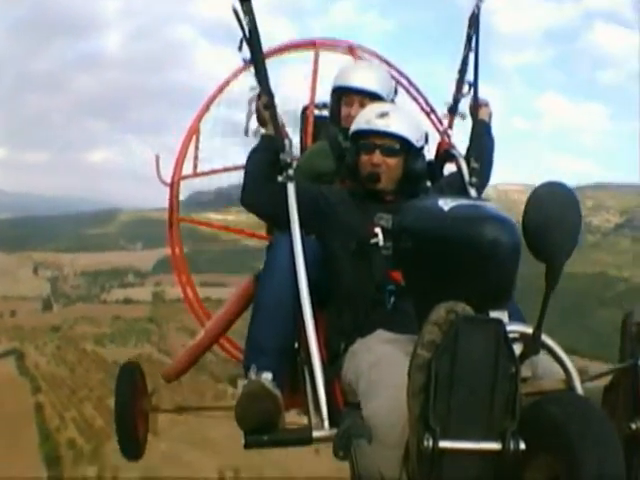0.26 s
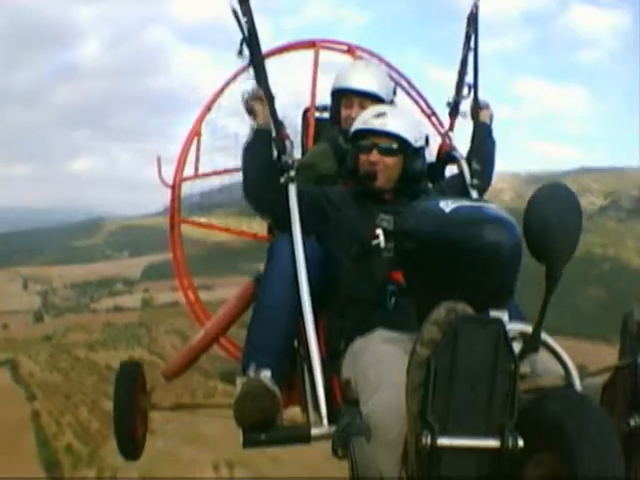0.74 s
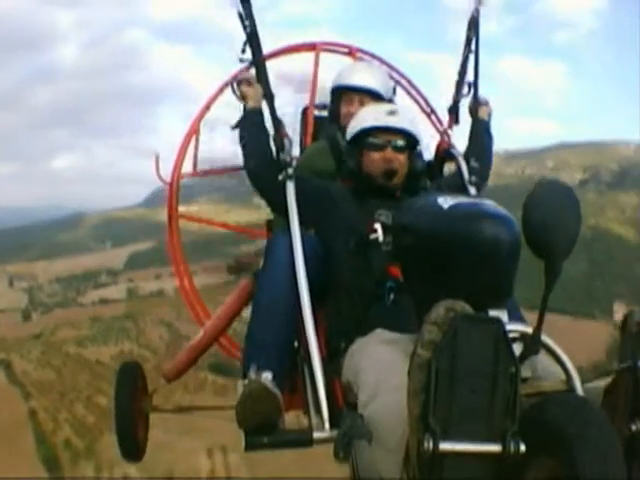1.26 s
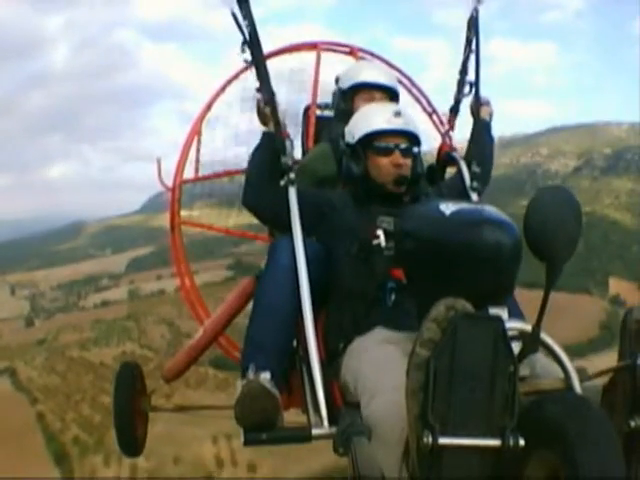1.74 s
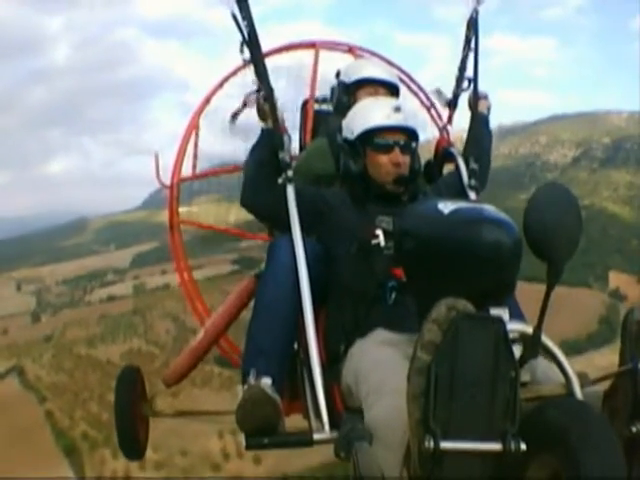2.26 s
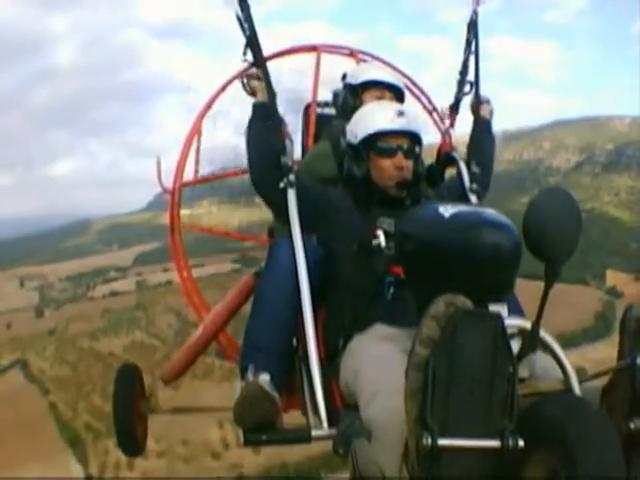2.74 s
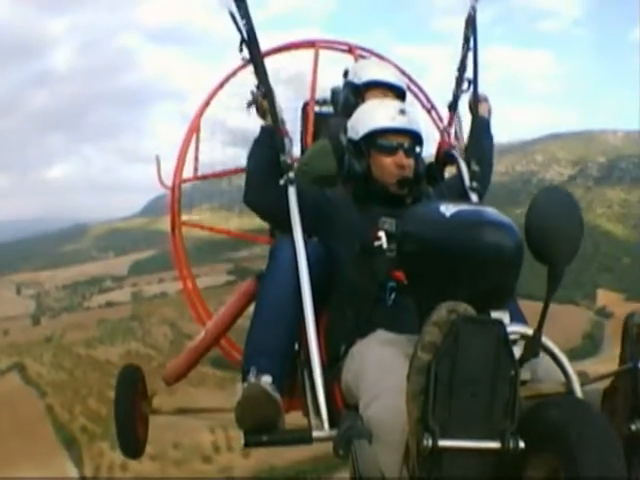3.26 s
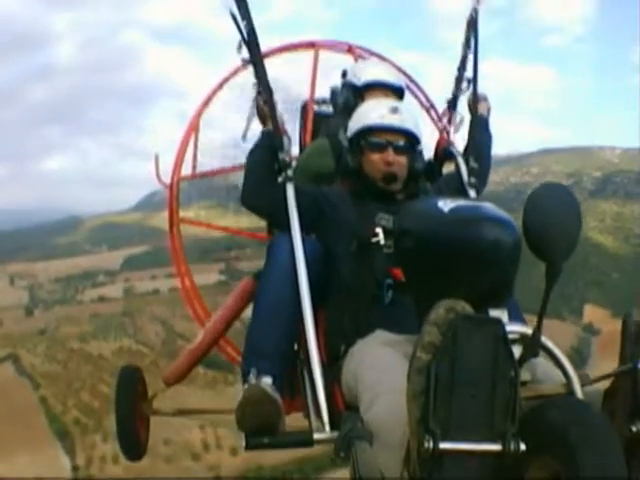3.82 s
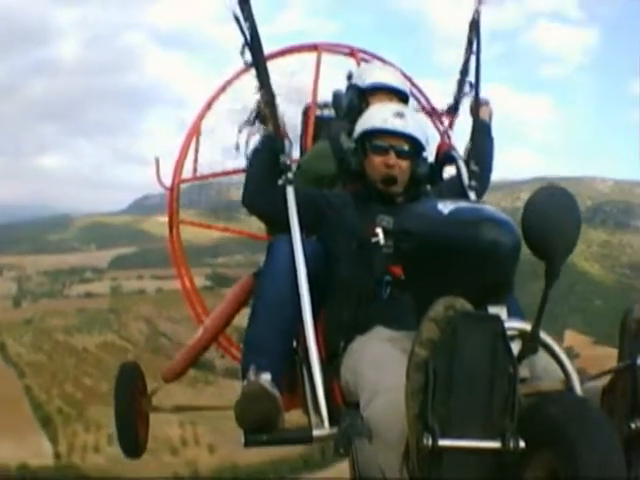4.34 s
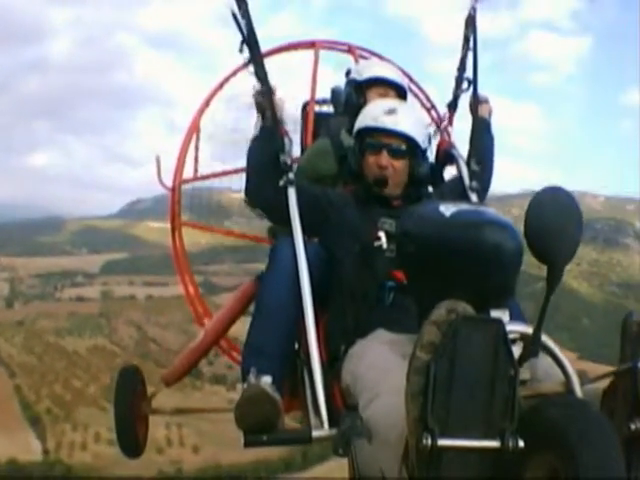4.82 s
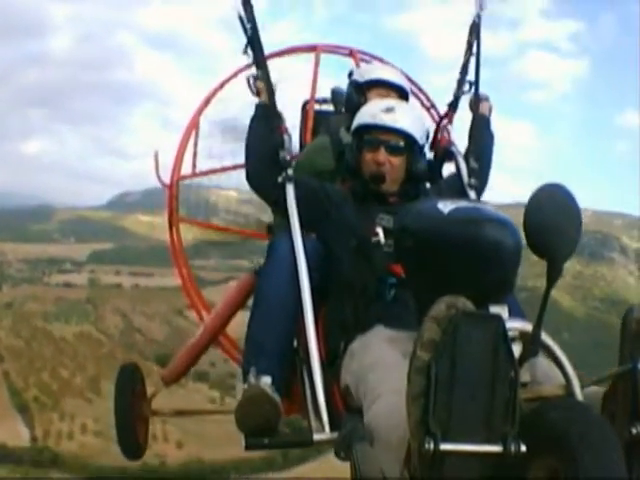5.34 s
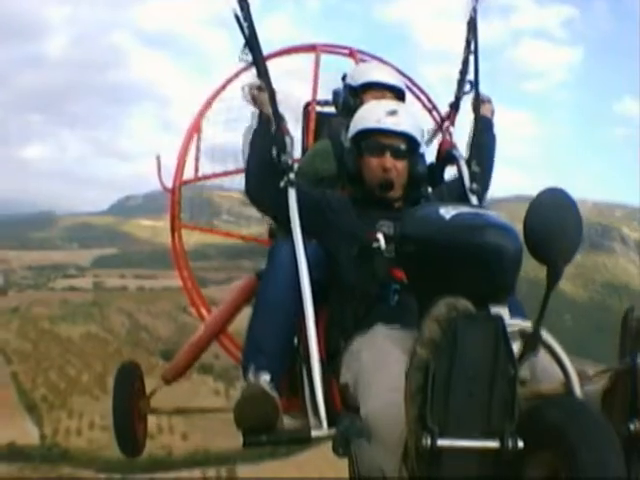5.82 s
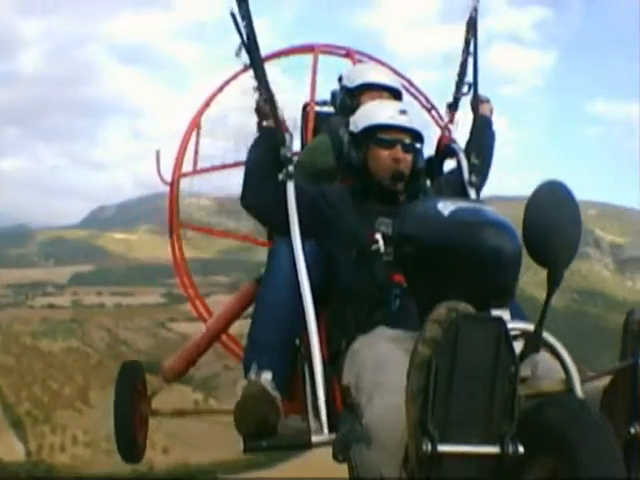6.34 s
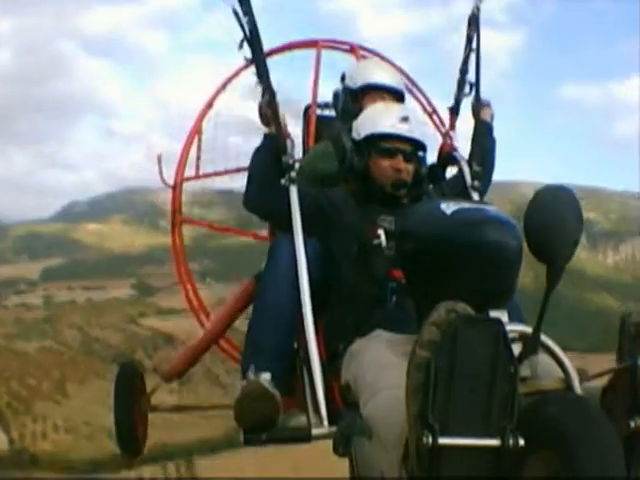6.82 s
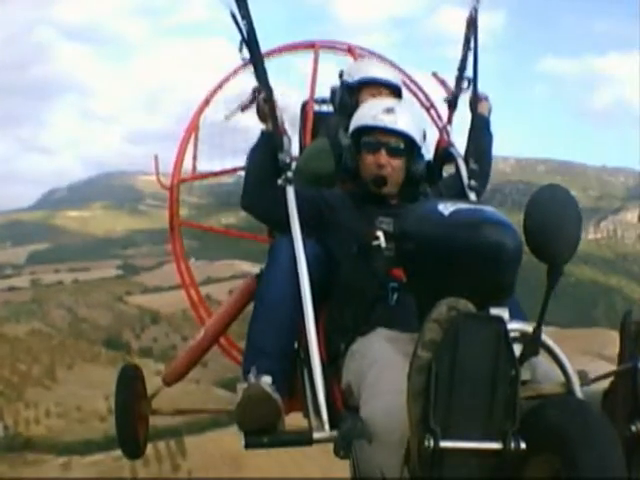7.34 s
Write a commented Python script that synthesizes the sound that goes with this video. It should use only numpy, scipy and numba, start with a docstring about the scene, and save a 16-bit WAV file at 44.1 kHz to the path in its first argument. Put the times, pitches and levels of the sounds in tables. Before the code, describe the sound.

A powered paraglider cruises through open air, its two-stroke engine buzzing and its propeller droning at constant throttle. A roar of rushing wind blends with the drone throughout, along with a faint rasp. Short, sharp pops strike at irregular intervals, several a second, each making the sound dip for an instant. The small onboard microphone is close, and the sound is coarse, slightly distorted and light on bass.

```python
"""Paramotor trike in cruise

A two-stroke's firings and the geared propeller's blade beats stand over the roar of the slipstream.
The throttle is steady. A small camera on a boom in front of the pilot hears it all.
Pressure bursts overload the camera: it clips, ducks its gain and lets it creep back; it samples coarsely."""
import sys
import numpy as np
from scipy import signal
from scipy.fft import rfft, irfft, next_fast_len
from scipy.io import wavfile
from scipy.ndimage import uniform_filter1d
from numba import njit

SR = 44100
rng = np.random.default_rng(int(sys.argv[2]) if len(sys.argv) > 2 else 0)


def master_out(mix):
    """Clip the mix to full scale and print it as 16-bit PCM to the path in sys.argv[1]."""
    frames = np.transpose(np.atleast_2d(mix))
    ceiling = np.clip(frames, -1, 1)
    pcm = np.round(ceiling * 32767).astype(np.int16)
    wavfile.write(sys.argv[1], SR, pcm)


N = 334278
CEILING = 0.63  # gain control threshold


def undb(db):
    """Decibels to gain."""
    return 10 ** (np.asarray(db) / 20)


def butter(x, order, hz, kind):
    """Causal Butterworth filter."""
    return signal.sosfilt(signal.butter(order, hz, kind, fs=SR, output="sos"), x)


def curve(rows):
    """Rows of (seconds, value), interpolated to every sample."""
    return np.interp(np.arange(N) / SR, *np.transpose(rows))


def walk(rate_hz, hop=32):
    """Random levels held 1 / rate_hz seconds and smoothed twice; unit spread."""
    hold = int(SR / hop / rate_hz)
    steps = np.repeat(rng.standard_normal(N // hop // hold + 2), hold)
    smooth = uniform_filter1d(uniform_filter1d(steps, hold), hold)
    return np.interp(np.arange(N) / hop, np.arange(len(smooth)), smooth / smooth.std())


def note(cycles, partials, waver_db, waver_hz):
    """Partials locked to a shaft; turbulence makes each waver on its own."""
    out = 0
    for multiple, db in partials:
        amplitude = np.sqrt(2) * undb(db + waver_db * walk(waver_hz))
        out += amplitude * np.sin(2 * np.pi * (multiple * cycles + rng.random()))
    return out


# Slipstream spectrum. Each row: frequency in Hz, relative density in dB.
ROAR_SPECTRUM = [(20, -16), (32, 3), (50, -8.5), (110, -9.5), (170, -10.5), (260, -4), (400, -2.5),
                 (700, 0.5), (1000, -3), (1400, -8.5), (2000, -18.5), (2700, -28), (3600, -27), (4600, -32),
                 (5800, -28)]


def slipstream(firings, blades, level_db=-14, gust_db=.5, gust_hz=2.51):
    """Half-octave bands of roar flicker apart; the upper ones surge, chopped by firings and blades."""
    size = next_fast_len(N)
    hz = np.fft.rfftfreq(size, 1 / SR).clip(1)
    knot_hz, knot_db = np.transpose(ROAR_SPECTRUM)
    spectrum = rfft(rng.standard_normal(size)) * undb(np.interp(np.log(hz), np.log(knot_hz), knot_db))
    chop = 0.056 * np.cos(2 * np.pi * firings) + 0.18 * np.cos(2 * np.pi * blades)
    roar, surge_db = 0, 1.02 * walk(rate_hz=14.)
    for centre_hz in 20 * 2 ** np.arange(0, 9, .5):
        share = np.cos(np.pi * np.log2(hz / centre_hz).clip(-.5, .5)) ** 2  # neighbours sum to one
        band = irfft(spectrum * share, size)[:N]
        upper = min(centre_hz / 1360, 1)
        flicker_db = 0.86 * walk(rate_hz=8.2)
        roar += band * undb(flicker_db + upper * surge_db) * (1 + upper * chop)
    return roar / roar.std() * undb(level_db + gust_db * walk(gust_hz))


# Strong pressure bursts. Each row: time of the push in seconds, level in dB re CEILING.
STRONG_BURSTS = [(0.077, 8), (0.4, 6), (0.5, 11.5), (0.733, 9), (1.122, 11), (1.189, 11), (1.277, 8),
                 (1.333, 10), (1.491, 11.5), (1.699, 14), (1.984, 9), (2.212, 8), (2.527, 11), (2.738, 12),
                 (2.79, 7), (3.048, 8.5), (3.27, 8), (3.313, 10), (3.469, 9.5), (3.568, 9), (3.745, 14.5),
                 (3.869, 11), (4.356, 10.5), (4.478, 8), (4.837, 8), (4.899, 14), (5.199, 11), (5.289, 9.5),
                 (5.39, 11), (5.448, 9), (5.773, 12.5), (6.102, 9.5), (6.315, 12), (6.383, 7.5),
                 (6.65, 14.5), (6.741, 6.5), (6.987, 8), (7.467, 7.5)]


def pressure_bursts(swing_hz=560, small_per_s=2.5, small_db=6, spread_db=1.5):
    """Each is one swing, suction then push; smaller ones fall at random among the strong."""
    cycles = np.arange(-1, .5, swing_hz / SR)
    swing = np.cos(2 * np.pi * cycles) * np.hanning(len(cycles)) ** 1.02
    draws = rng.random((int(small_per_s * N / SR), 2))
    small = [(.01 + when * N / SR, small_db + spread_db * (2 * size - 1)) for when, size in draws]
    out = np.zeros(N + SR)
    for push_s, db in list(STRONG_BURSTS) + small:
        start = int((push_s - 1 / swing_hz) * SR)
        out[start:start + len(swing)] += CEILING * undb(db) * swing
    return out[:N]


# Frame hums. Each row: multiple of the firing rate, level in dB.
FRAME_PARTIALS = [(.535, -38), (2.14, -40), (3.72, -49)]


def frame(firings):
    """The frame hums faintly, following the crank."""
    return note(firings, FRAME_PARTIALS, waver_db=1.5, waver_hz=2.1)


# Propeller note. Each row: multiple of the blade rate, level in dB.
PROPELLER_PARTIALS = [(1, -36.5), (2, -40), (3, -29), (4, -30.5), (5, -30), (6, -34), (7, -32.5),
                      (8, -33.5), (10, -39), (11, -34.5), (14, -42), (15, -43.5), (16, -46), (17, -40.5),
                      (18, -42.5), (19, -49)]


def propeller(blades):
    """Blade beats make a harmonic drone."""
    return note(blades, PROPELLER_PARTIALS, waver_db=2.42, waver_hz=4.07)


# Exhaust note. Each row: multiple of the firing rate, level in dB, dB added at a colour shift of 1.
EXHAUST_PARTIALS = [(1, -36.5, -6), (2, -27, 0.5), (3, -23, -1.5), (4, -27, 7.5), (5, -26.5, -1.5),
                    (6, -23.5, 2.5), (7, -25.5, -3.5), (9, -29, 1), (10, -30.5, -1), (11, -32, -4.5),
                    (12, -33, 0), (13, -33, 2), (14, -36.5, -2), (16, -40.5, -5), (17, -48.5, 3),
                    (18, -44.5, 4), (19, -49, -2)]
# Drift of the exhaust's colour. Each row: time in seconds, unitless shift.
COLOUR_SHIFT = [(0, .05), (2.1, .2), (3, -0.21), (3.5, 0.16), (4.7, -.13), (5.8, 0.82), (6.5, 0.67),
                (7, .05), (7.58, -.14)]


def exhaust(firings):
    """Two-stroke firings make a harmonic buzz whose colour drifts."""
    shift = curve(COLOUR_SHIFT)
    partials = [(multiple, db + shift_db * shift) for multiple, db, shift_db in EXHAUST_PARTIALS]
    return note(firings, partials, waver_db=1.3, waver_hz=9.)


def rasp(drone, sharpness=1.8, level_db=-33):
    """A crackle that rides the drone's pressure peaks."""
    peaks = uniform_filter1d(np.abs(drone), size=40) ** sharpness
    crackle = peaks * butter(rng.standard_normal(N), 2, [2100, 4200], "band")
    return undb(level_db) * crackle / crackle.std()


# Crank speed. Each row: time in seconds, firings per second.
FIRING_RATE = [(0.0, 99.9), (0.6, 99.86), (1.2, 99.54), (1.8, 99.37), (2.4, 99.46), (3.3, 99.8),
               (3.9, 99.62), (4.8, 99.5), (6.0, 99.5), (6.6, 98.73), (6.9, 98.87), (7.2, 99.24),
               (7.58, 99.45)]


def scene(blades_per_firing=.9035, tone_gain_db=2.5):
    """The crank paces exhaust, frame and, through a reduction drive, propeller; roar and bursts join."""
    firings = np.cumsum(curve(FIRING_RATE)) / SR
    blades = blades_per_firing * firings
    tones = exhaust(firings) + propeller(blades) + frame(firings)
    drone = undb(tone_gain_db) * tones + slipstream(firings, blades)
    return (drone + rasp(drone) + pressure_bursts())[None]


@njit
def gain_control(x, attack_s=0.00024, release_s=0.024):
    """Ducks fast on peaks over the ceiling, recovers slowly."""
    out, envelope = np.empty(len(x)), CEILING
    for i in range(len(x)):
        out[i] = x[i] * CEILING / envelope
        peak = max(abs(x[i]), CEILING)
        envelope += (peak - envelope) / (SR * (attack_s if peak > envelope else release_s))
    return out


def overload(x, rail=.69, push_rail=.54, coupling_hz=115):
    """The amplifier saturates earlier on the push; its coupling lets pushes overshoot to the rail."""
    saturated = np.clip(x, -rail, push_rail)
    return np.clip(butter(saturated, 1, coupling_hz, "high"), -rail, rail)


def coarse_sampling(x, anti_alias_hz=3900, camera_hz=12100, converter_hz=32000, step_share=0.21):
    """A crude converter glides, then steps, mirroring the sound about multiples of the camera rate."""
    coarse = signal.resample_poly(butter(x, 4, anti_alias_hz, "low"), camera_hz, SR)
    position = np.arange(N * converter_hz // SR) * camera_hz / converter_hz
    late_glide = (1 - step_share) * (position % 1) ** 1.2
    converted = np.interp(np.floor(position) + late_glide, np.arange(len(coarse)), coarse)
    out = signal.resample_poly(converted, SR, converter_hz, window=("kaiser", 2.))
    return np.pad(out, (0, N))[:N]


def record(dry, bass_cut_hz=200, dc_offset=-.008, lift=0.95, lift_hz=10300, top_cut_hz=15760):
    """The camera: bass cut, gain control, overload, coarse sampling, treble lift, steep top cut."""
    x = butter(dry[0], 1, bass_cut_hz, "high")
    x = overload(gain_control(x))
    x = coarse_sampling(x) + dc_offset
    treble = signal.sosfiltfilt(signal.butter(3, lift_hz, "high", fs=SR, output="sos"), x)
    top_cut = signal.ellip(14, .3, 70, top_cut_hz, fs=SR, output="sos")
    return signal.sosfilt(top_cut, x + lift * treble)[None]


dry = scene()
out = record(dry)
master_out(out)
```